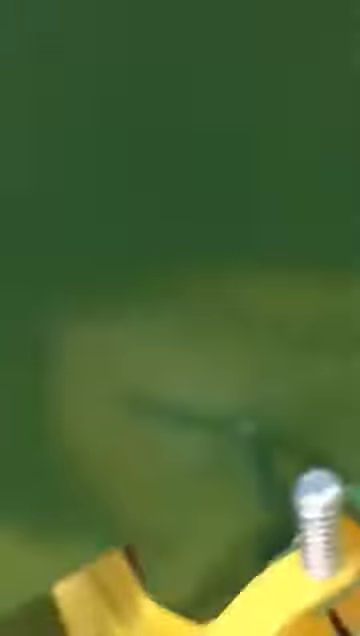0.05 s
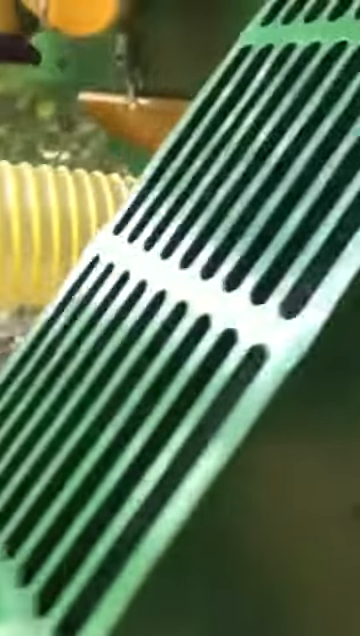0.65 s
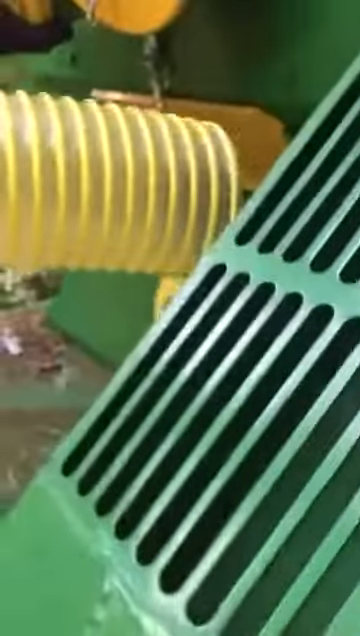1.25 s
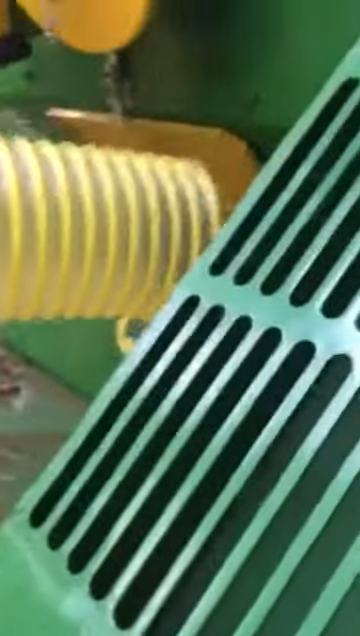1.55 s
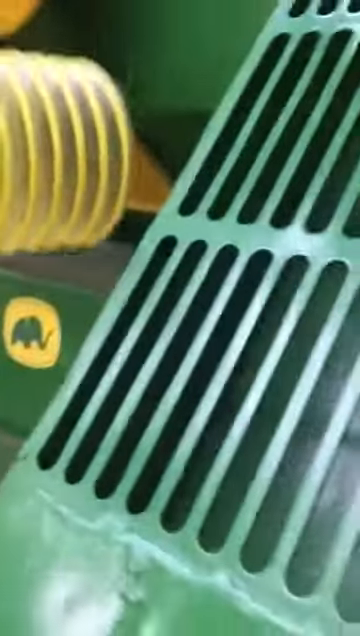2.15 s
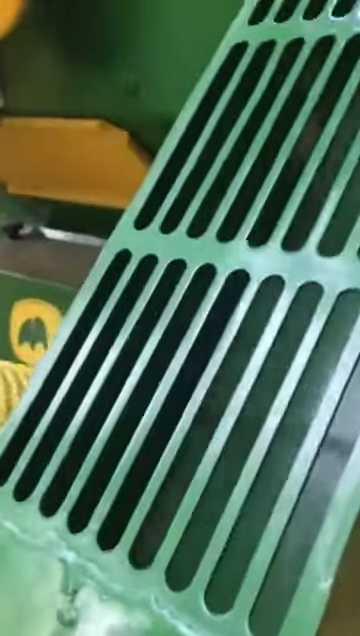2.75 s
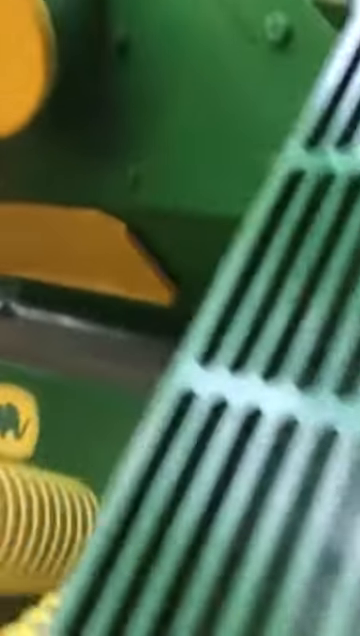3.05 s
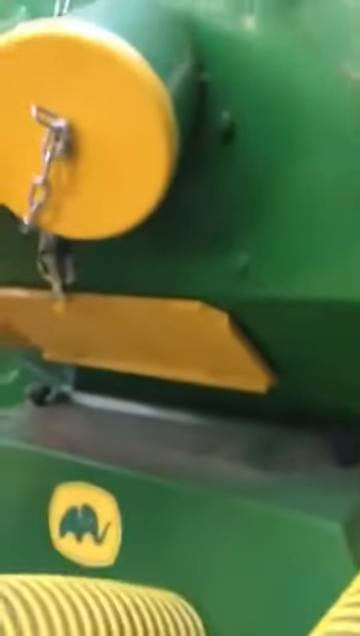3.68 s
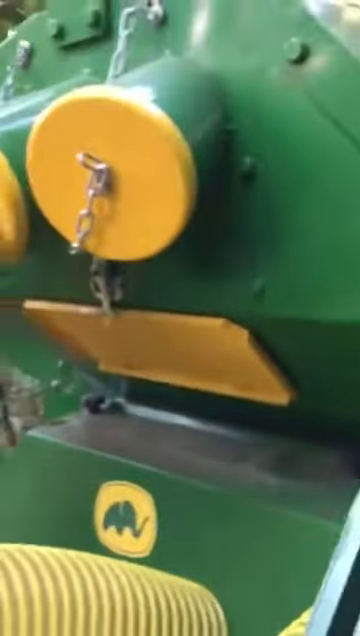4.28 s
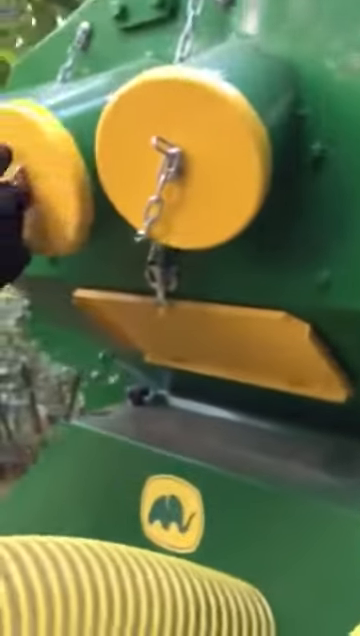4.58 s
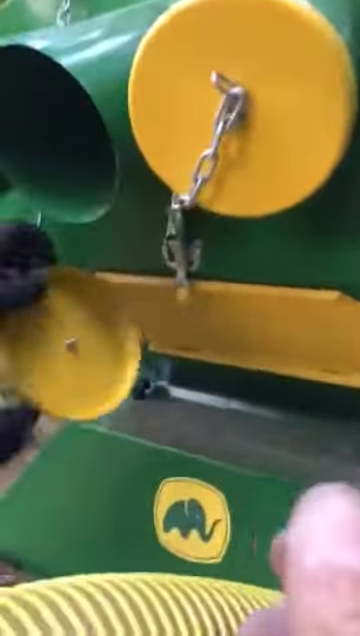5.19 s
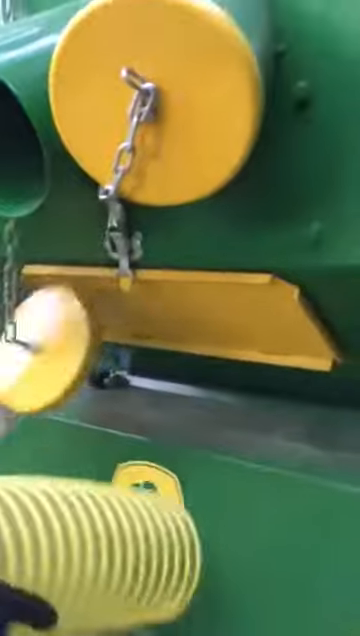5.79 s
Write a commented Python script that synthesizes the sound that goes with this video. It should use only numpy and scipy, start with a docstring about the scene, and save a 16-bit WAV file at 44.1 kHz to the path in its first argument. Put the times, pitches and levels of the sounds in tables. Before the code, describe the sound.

A harvesting machine runs steadily at close range, its blower roaring and whining over a low engine rumble while gritty air hisses through the ducts. About halfway through, dull knocks and finger rumble start hitting the hand-held microphone, briefly pushing the roar down. Two hard taps cut through, a cap scrapes off a port, and the whine sags slightly as a loose chain clinks faintly.

```python
"""Beside a harvesting machine running at steady speed, on a hand-held phone at close range. The blower
whines and roars in its sheet-steel casing, the engine rumbles below, gritty air hisses in the ducts and
loose chain links clink. Air buffets the microphone; dull handling knocks overload it and make its gain
control duck the roar. A cap is pulled off a port and the whine sags."""
import sys
import numpy as np
from scipy import signal
from scipy.fft import rfft, irfft, next_fast_len
from scipy.io import wavfile
from scipy.ndimage import map_coordinates

SR = 44100
rng = np.random.default_rng(int(sys.argv[2]) if len(sys.argv) > 2 else 0)


def int16_out(signal):
    """Quantize to a 16-bit WAV file."""
    q = np.round(np.clip(np.atleast_2d(signal).T, -1, 1) * 32767)
    wavfile.write(sys.argv[1], SR, q.astype(np.int16))


N = 257103

# handling knocks on the phone: start_s, thud_db, clack_db, pitch_hz
HANDLING_KNOCKS = [(3.274, 2.5, -21, 233), (3.283, -1.5, -20, 170), (3.296, 1, -22, 148),
                   (3.31, -4, -28, 72), (3.428, -6, -20, 200), (3.446, -1, -18, 200), (3.461, 4, -19, 189),
                   (3.475, -1.5, -10.5, 130), (3.513, -14, -24, 260), (3.655, -5.5, -21, 117),
                   (3.732, -2.5, -14, 265), (3.873, 2.5, -30, 120), (3.918, -10.5, -26, 160),
                   (3.956, 0, -15, 186), (3.965, 0, -14, 137), (3.988, -2.5, -30, 137),
                   (4.029, -3.5, -15, 250), (4.038, -8, -19, 234), (4.067, 4.5, -18, 189),
                   (4.078, 0, -19, 86), (4.105, -11, -20, 140), (4.144, 5.5, -17, 178),
                   (4.155, -1, -33, 106), (4.197, 0.5, -24, 175), (4.253, -1.5, -21, 138),
                   (4.264, -4, -30, 140), (4.337, 1.5, -11, 142), (4.353, 0, -27, 118),
                   (4.385, -6, -23, 197), (4.427, -4.5, -15, 99.6), (4.455, -2, -33, 168),
                   (4.497, 9, -9, 186), (4.538, 0.5, -19, 143), (4.584, 2.5, -29, 122),
                   (4.612, -6, -18, 121), (4.685, -4, -38, 79.6), (4.732, -4, -21, 177),
                   (4.784, 2, -14.5, 134), (4.805, -10, -34, 150), (4.837, 0.5, -14, 251),
                   (4.852, -2, -13.5, 158), (4.868, 1, -10.5, 125), (4.999, -3, -18, 144.5),
                   (5.074, -8, -23, 138), (5.3204, -2.5, -16, 111.6), (5.776, -7, -50, 75)]


def amp(db):
    """Decibels to gain."""
    return 10 ** (np.asarray(db) / 20)


def unit(x):
    """x at rms 1."""
    return x / np.sqrt(np.mean(x ** 2) + 1e-20)


def along(points, hz):
    """(freq_hz, value) points read on a log frequency axis."""
    freqs, values = np.transpose(points)
    return np.interp(np.log(hz + 1), np.log(freqs + 1), values)


def curves(rows):
    """One value per sample for each column after the time."""
    times, *columns = np.transpose(rows)
    return [np.interp(np.arange(N) / SR, times, column) for column in columns]


def wobble(rate):
    """A smooth random curve, rate knots a second."""
    steps = np.arange(0, N, 32)
    coarse = map_coordinates(rng.standard_normal(8192), [steps * rate / SR], mode="wrap")
    return np.interp(np.arange(N), steps, coarse)


def swell(peak_s, width_s):
    """A smooth rise to 1 at peak_s and a matching fall."""
    return np.exp(-((np.arange(N) / SR - peak_s) / width_s) ** 2)


def filtered(x, response):
    """x through a complex response of frequency."""
    size = next_fast_len(len(x) + SR // 4)
    return irfft(rfft(x, size) * response(np.fft.rfftfreq(size, 1 / SR)), size)[:len(x)]


def coloured(x, spectrum):
    """x through a (freq_hz, level_db) spectrum, at rms 1."""
    return unit(filtered(x, lambda hz: amp(along(spectrum, hz))))


def resonance(hz, centre_hz, width_hz):
    """Causal response of one resonance."""
    return 1j * hz * width_hz / (centre_hz ** 2 - hz ** 2 + 1j * hz * width_hz)


def ringing_noise(size, centre_hz, width_hz):
    """Noise passed twice through one resonance, at rms 1."""
    return unit(filtered(rng.standard_normal(size), lambda hz: resonance(hz, centre_hz, width_hz) ** 2))


def impulse(spectrum, spread_s, size=8192):
    """Causal response of peak 1; as in a bent sheet, lows arrive later (by spread_s at 100 Hz)."""
    hz = np.fft.rfftfreq(size, 1 / SR)
    cepstrum = irfft(np.log(amp(along(spectrum, hz))))
    fold = np.r_[1, np.full(size // 2 - 1, 2), np.zeros(size // 2)]  # gives minimum phase
    lag = 4 * np.pi * spread_s * np.sqrt(100 * hz)
    response = irfft(np.exp(rfft(cepstrum * fold) - 1j * lag))[:size // 2]
    return response / np.abs(response).max()


def add(track, start_s, sound):
    """Mix a sound into the track at start_s."""
    part = track[round(start_s * SR):][:len(sound)]
    part += sound[:len(part)]


def engine(level_db):
    """A rough rumble with the drive's steady hums in it; both fade together as the phone moves."""
    # spectrum of the engine's rumble: freq_hz, level_db
    spectrum = [(30, -42), (60, -9), (110, -5.5), (190, -2.5), (245, 1), (285, 0.5), (335, -5.5), (430, -5),
                (600, -7), (1000, -33), (2000, -62)]
    # hums of the drive: pitch_hz, level_db
    drive_hums = [(61, -44), (152.5, -38), (1457, -58)]
    t = np.arange(N) / SR
    rumble = coloured(rng.standard_normal(N), spectrum) * amp(level_db + 1 + 2.2 * wobble(26))
    hums = np.zeros(N)
    for hz, db in drive_hums:
        strength = np.sqrt(2) * amp(db + 0.57 * wobble(2.1))
        hums += strength * np.sin(2 * np.pi * hz * t + 0.28 * wobble(8.2))
    return rumble + hums * amp(level_db - level_db.mean())


def blower(casing_db, duct_db):
    """Turbulence rings the casing and rushes through the ducts, in shared surges."""
    # air resonances of the casing: centre_hz, width_hz, level_db
    casing_modes = [(484, 58, -6.5), (558, 37, -0.5), (634.4, 91, 1), (722, 55, -2.5), (794, 26, -7)]
    # broad rush of the ducts: freq_hz, level_db
    rush_spectrum = [(300, -32.5), (700, 4), (900, -2), (1000, -4.5), (1500, -3.5), (1750, -4),
                     (2200, -0.5), (2550, -0.5), (2900, -6), (3300, -10.5), (4200, -8), (7000, -20)]
    # duct resonances standing above that rush: centre_hz, width_hz, boost_db
    duct_modes = [(1052, 25, 4.5), (1184, 77, 6), (1377, 200, 5.5), (1588, 62, 5.5), (1630, 45, 2),
                  (1682, 33, 4.5), (1820, 45, 6), (1990, 36, 7), (2120, 66, 2.5), (2370, 47, 5.5),
                  (2865, 72, 4), (3300, 100, 6)]

    def casing(hz):
        return sum((-1) ** k * amp(db) * resonance(hz, centre, width)
                   for k, (centre, width, db) in enumerate(casing_modes))

    def ducts(hz):
        peaks_db = sum(db / (1 + (2 * (hz - centre) / width) ** 2) for centre, width, db in duct_modes)
        return amp(along(rush_spectrum, hz) + peaks_db)

    surge_db = wobble(24.84)
    roar = unit(filtered(rng.standard_normal(N), casing)) * amp(casing_db - 0.97 + surge_db)
    rush = unit(filtered(rng.standard_normal(N), ducts)) * amp(duct_db + 1 + 0.5 * surge_db)
    return roar + rush


def whine(blade_hz=697.2, port_open_s=4.88, sag_hz_per_s=18, flutter_db=2.3, jitter_rad=0.025):
    """Blades pass the casing's tongue at an even pace; the turbulent intake shakes each partial."""
    # blade partials at the moving phone: time_s, first_db, second_db, third_db
    partials = [(0, -27, -31.5, -41), (.3, -29, -29.5, -38), (.55, -27.5, -26.5, -31),
                (.75, -25.5, -31.5, -33), (1.15, -25, -31, -47), (1.65, -22, -35.5, -32),
                (2.15, -23, -27.5, -38), (2.8, -22.5, -31, -31.5), (3.25, -24.5, -32.5, -40),
                (3.6, -25, -33, -38), (4.25, -25.5, -30.5, -37), (4.75, -23, -27.5, -32.5),
                (5.1, -23.5, -38, -34), (5.83, -28, -42, -46)]
    # once the port is open the blower slowly loses speed
    sag_hz = sag_hz_per_s * np.maximum(np.arange(N) / SR - port_open_s, 0)
    phase = 2 * np.pi * np.cumsum(blade_hz - sag_hz + 0.323 * wobble(1.602)) / SR
    tone = np.zeros(N)
    for k, db in enumerate(curves(partials), 1):
        strength = np.sqrt(2) * amp(db + flutter_db * wobble(22))
        tone += strength * np.sin(k * phase + jitter_rad * wobble(41))
    return tone


def guard_gap():
    """The space behind the guard drones and sings hoarsely as the phone passes close by."""
    # air resonances behind the guard: centre_hz, width_hz, level_db
    modes = [(234, 64, -29), (571, 29, -29.5), (627, 64, -31), (1387, 90, -29.5)]
    drone = sum(amp(db) * ringing_noise(N, centre, width) for centre, width, db in modes)
    return swell(peak_s=0.4, width_s=0.44) * drone


def hiss_level(duct_db, follow=0.4, duck_at_s=3.27, duck_s=0.06, duck_db=-1):
    """The hiss follows the duct air and surges; it ducks at the first loud knock and stays a bit lower."""
    # surges of gritty air: peak_s, width_s, rise_db
    surges = [(0.517, 0.026, 3.5), (1.657, 0.062, 4.5), (1.797, 0.027, 5), (2.353, 0.32, 3),
              (2.894, 0.06, 4), (3.027, 0.029, 6), (4.216, 0.014, 4.5), (4.94, 0.047, 3.5),
              (5.636, .03, 2.5)]
    usual_db = duct_db.mean()
    base_db = usual_db - 3 + follow * (duct_db - usual_db)
    duck = np.clip((np.arange(N) / SR - duck_at_s) / duck_s + 0.5, 0, 1)
    surges_db = sum(db * swell(peak_s, width_s) for peak_s, width_s, db in surges)
    return base_db + duck_db * duck + surges_db - 0.63 * wobble(24)


def spray(bursts_per_s, t60_s, burst_share):
    """Loudness of a steady flow with bursts of grit that strike at once and die away."""
    strikes = (rng.random(N) < bursts_per_s / SR) * rng.uniform(0.098, 1, N)
    decay = amp(-60 * np.arange(SR // 4) / SR / t60_s) ** 2
    power = np.abs(signal.fftconvolve(strikes, decay)[:N])
    return np.sqrt(1 - burst_share + burst_share * power / power.mean())


def grit(level_db, grains_per_s=1500, grain_share=0.064, split_hz=7200):
    """Dust ticks and hisses on the duct walls; fine and coarse grit share only part of their bursts."""
    # spectrum of dust on the walls: freq_hz, level_db
    fizz = [(1200, -34), (2500, -2), (3200, 1.5), (3700, -1), (4300, 0), (4950, -4), (5500, 1), (6400, 0),
            (7400, -3.5), (8800, -5.5), (9800, -7), (10400, -19)]
    ticks = unit((rng.random(N) < grains_per_s / SR) * rng.standard_normal(N))
    hiss = rng.standard_normal(N)
    flow = coloured(np.sqrt(1 - grain_share) * hiss + np.sqrt(grain_share) * ticks, fizz)
    coarse = filtered(flow, lambda hz: 1 / (1 + (hz / split_hz) ** 8))
    fine = flow - coarse
    dust = sum(part * spray(bursts_per_s=70, t60_s=0.23, burst_share=0.45) for part in (coarse, fine))
    return dust * spray(bursts_per_s=62, t60_s=0.074, burst_share=0.4) * amp(level_db)


def buffeting(breeze_db=-39, grip_db=-21, lump_db=4):
    """A constant light breeze, puffs of air and the shifting grip shake the microphone in low lumps."""
    # puffs of air on the microphone: peak_s, width_s, level_db
    puffs = [(0.103, 0.12, -32), (0.56, 0.38, -30), (1.376, 0.042, -28), (1.793, 0.2, -27.5),
             (2.143, 0.034, -21.5), (3, 0.069, -21), (5.516, 0.028, -23), (5.775, 0.063, -22)]
    # spectrum of the shaken microphone: freq_hz, level_db
    spectrum = [(15, -34), (28, -21), (42, -3.5), (62, 2), (100, -4), (170, -5.5), (280, -26.5), (600, -43)]
    air = amp(breeze_db) + sum(amp(db) * swell(peak_s, width_s) for peak_s, width_s, db in puffs)
    grip = amp(grip_db) * swell(peak_s=4.56, width_s=0.96)
    lumps = unit(coloured(rng.standard_normal(N), spectrum) * amp(lump_db * wobble(22)))
    return (air + grip) * lumps


def chain_clinks(t60_s=0.19, attack_s=0.002):
    """Loose chain links touch and ring briefly, each at its own pitch."""
    # touches of the links: start_s, pitch_hz, level_db
    clinks = [(0.114, 4400, -20), (5.432, 4100, -28), (5.432, 2920, -25), (5.546, 4530, -27),
              (5.639, 4800, -24)]
    t = np.arange(SR // 4) / SR
    fade = amp(-60 * t / t60_s) * (1 - np.exp(-t / attack_s))
    track = np.zeros(N)
    for start_s, pitch_hz, db in clinks:
        add(track, start_s, amp(db) * fade * np.sin(2 * np.pi * pitch_hz * t))
    return track


def scuffs():
    """Short scuffs, the hollow body of some knocks and the cap's scrape each swell in one resonance."""
    # scuffs and knock bodies (low), cap scrape (high): peak_s, width_s, centre_hz, width_hz, level_db
    bursts = [(3.262, 0.039, 340, 403, -21), (3.289, 0.02, 400, 380, -12), (3.464, 0.032, 308, 405, -12),
              (3.935, 0.042, 294, 540, -21), (3.732, 0.019, 900, 1300, -18), (4.036, 0.017, 600, 700, -18),
              (4.079, 0.015, 420, 524, -17), (4.468, 0.022, 260, 303, -21), (5.319, 0.0089, 605, 700, -8),
              (4.902, 0.078, 2200, 2200, -18.5), (4.941, 0.055, 3700, 2800, -23.5)]
    t = np.arange(-SR // 4, SR // 4) / SR
    track = np.zeros(N)
    for peak_s, width_s, centre_hz, width_hz, db in bursts:
        envelope = amp(db) * np.exp(-2 * (t / width_s) ** 2)
        add(track, peak_s + t[0], envelope * ringing_noise(len(t), centre_hz, width_hz))
    return track


def finger_presses(level_db=-20.5, press_s=0.025):
    """Fingers bear down before each knock and roll off after it, merging close knocks into a rumble."""
    # rumble of pressing fingers: freq_hz, level_db
    spectrum = [(30, -27), (55, 2), (100, 1), (210, -1), (300, -7), (450, -13.5), (900, -53)]
    blows = np.zeros(N)
    for start_s, thud_db, _, _ in HANDLING_KNOCKS:
        blows[round(start_s * SR)] += amp(thud_db) ** 2
    t = np.arange(-SR // 4, SR // 4) / SR
    power = np.abs(signal.fftconvolve(blows, np.exp(-(t / press_s) ** 2), mode="same"))
    return amp(level_db) * np.sqrt(power) * coloured(rng.standard_normal(N), spectrum)


def knocks(scuff_t60_s=0.099, boom_t60_s=0.06, usual_hz=140, usual_contact_s=0.00025,
           usual_clack_db=-20.5):
    """Each knock drops from a short clack to a dull thud, booms for a few cycles and leaves a scuff."""
    # dull thud of a knock at usual_hz: freq_hz, level_db
    thud_spectrum = [(15, -56), (35, -12.5), (65, 7.5), (100, 2), (170, 3.5), (250, -4.5), (360, -6),
                     (520, -8.5), (900, -31.5), (2500, -83)]
    # clack of the contact: freq_hz, level_db
    clack_spectrum = [(150, -26), (450, -14), (700, 9), (860, 8), (1060, 11.5), (1400, -2), (1710, 2),
                      (2050, 1.5), (2450, -1), (3400, -8), (6000, -21), (10000, -46)]
    t = np.arange(4096) / SR
    around = np.arange(-256, 257) / SR
    scuff_fade = amp(-60 * t / scuff_t60_s) * (1 - np.exp(-t / 0.00022))
    boom_fade = amp(-60 * t / boom_t60_s) * (1 - np.exp(-t / 0.0045))
    track = np.zeros(N)
    for start_s, thud_db, clack_db, pitch_hz in HANDLING_KNOCKS:
        body = [(hz * pitch_hz / usual_hz, db) for hz, db in thud_spectrum]
        spread_s = 0.00388 * np.exp(0.14 * rng.standard_normal())
        scuff = scuff_fade * coloured(rng.standard_normal(len(t)), body)
        scrape = scuff_fade * coloured(rng.standard_normal(len(t)), clack_spectrum)
        boom = boom_fade / boom_fade.max() * np.sin(2 * np.pi * (pitch_hz * t + rng.random()))
        thud = amp(-1) * impulse(body, spread_s) + amp(-15) * scuff + amp(-9) * boom
        clack = amp(7.5) * impulse(clack_spectrum, spread_s) + amp(-3) * scrape
        # a softer, fleshier contact lasts longer and so rounds off the thud
        contact_s = usual_contact_s * amp(0.85 * (usual_clack_db - clack_db))
        push = np.exp(-(around / contact_s) ** 2)
        add(track, start_s + around[0], amp(thud_db) * signal.fftconvolve(thud, push / push.sum()))
        add(track, start_s, amp(clack_db) * clack)
    return track


def cap_taps(crack_t60_s=0.013):
    """Hard contacts give a bright crack a few milliseconds long and ring the cap briefly."""
    # hard taps: start_s, crack_db, ring_db
    taps = [(3.427, -14, -12), (3.4425, 5.5, -12), (3.479, -14, -18), (4.495, -0.5, 1), (4.506, -5, -13)]
    # spectrum of the crack: freq_hz, level_db
    spectrum = [(300, 3), (900, 5), (1400, 7), (2400, 4.5), (4500, -9), (8000, -16), (10400, -23)]
    # modes of the cap and its port: pitch_hz, level_db, t60_s
    modes = [(1075, -9, 0.048), (1760, -13, 0.04), (2410, -19.5, .035), (3700, -27, .03)]
    t = np.arange(SR // 20) / SR
    fade = amp(-60 * t / crack_t60_s)
    ring = sum(amp(db - 60 * t / t60_s) * np.sin(2 * np.pi * hz * t) for hz, db, t60_s in modes)
    track = np.zeros(N)
    for start_s, crack_db, ring_db in taps:
        crack = fade * coloured(rng.standard_normal(len(t)), spectrum)
        add(track, start_s, amp(crack_db) * crack + amp(ring_db) * ring)
    return track


def fumble(bumps_per_s=130, level_db=-27):
    """Between the knocks the shifting fingers rattle the phone with many small bumps."""
    # spectrum of a finger's bump: freq_hz, level_db
    spectrum = [(45, -17), (80, -2), (140, 2), (210, 1), (330, -1), (550, -23), (1200, -35), (3000, -62)]
    bumps = (rng.random(N) < bumps_per_s / SR) * rng.uniform(0.37, 1, N)
    rattle = unit(signal.fftconvolve(bumps, impulse(spectrum, spread_s=0.00273))[:N])
    return amp(level_db) * swell(peak_s=4.57, width_s=0.43) * rattle


def scene():
    """The machine close by and the handling of the phone, all at one microphone."""
    # loudness of each source where the phone is: time_s, engine_db, casing_db, duct_db
    exposure = [(0, -19, -20, -23), (.45, -21, -21, -19.5), (1.05, -22.5, -19, -21), (1.8, -22, -19.5, -21),
                (2.7, -23, -21, -22), (3.2, -22.5, -20, -20.5), (3.4, -26, -21, -23),
                (4.3, -25.5, -17, -21), (4.8, -40, -17.5, -23), (5.15, -27, -20, -20),
                (5.55, -27, -20.5, -21.5), (5.83, -22.5, -20, -20.5)]
    engine_db, casing_db, duct_db = curves(exposure)
    machine = engine(engine_db) + blower(casing_db, duct_db) + whine() + guard_gap()
    machine += grit(hiss_level(duct_db)) + chain_clinks()
    mono = machine + buffeting() + fumble() + finger_presses() + knocks() + cap_taps() + scuffs()
    return np.array([mono, mono])


def overload(x):
    """Peaks flatten softly near full scale."""
    return x / (1 + np.abs(x) ** 6) ** (1 / 6)


def gain_control(x, threshold_db=-9, attack=0.13, release_db_per_s=5, block=220):
    """Loud blocks push the gain down at once; it creeps back afterwards."""
    starts = np.arange(0, N, block)
    gain_db = [0]
    for i in starts[:-1]:
        heard = overload(x[i:i + block] * amp(gain_db[-1]))
        level_db = 10 * np.log10(np.mean(heard ** 2) + 1e-12)
        step_db = release_db_per_s * block / SR - attack * max(0, level_db - threshold_db)
        gain_db.append(min(0, gain_db[-1] + step_db))
    return amp(np.interp(np.arange(N), starts + block / 2, gain_db))


def record(dry, low_cut_hz=34, high_cut_hz=10280):
    """The phone ducks loud sound, rounds off the peaks and loses the deepest bass and the top treble."""
    def band(hz):
        return 1 / np.sqrt((1 + (hz / high_cut_hz) ** 160) * (1 + (low_cut_hz / (hz + 1)) ** 8))

    held = overload(dry * gain_control(dry[0]))
    return np.array([filtered(channel, band) for channel in held])


dry = scene()
out = record(dry)
int16_out(out)
```